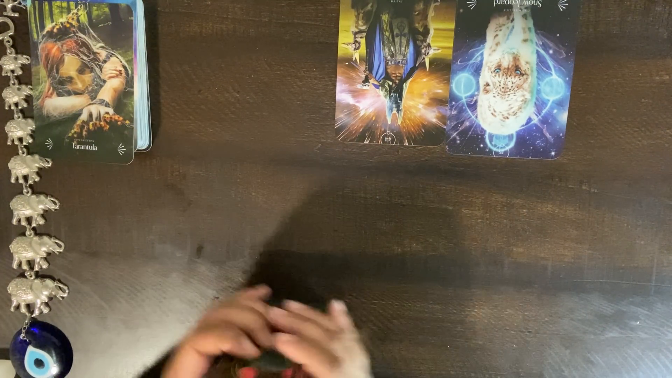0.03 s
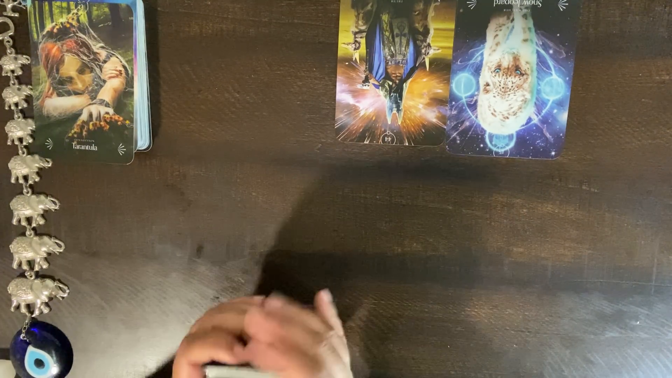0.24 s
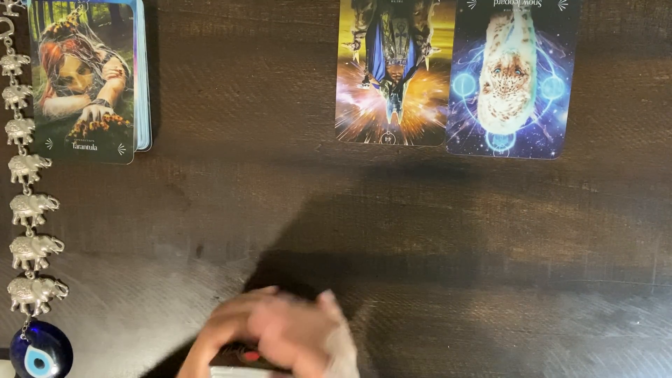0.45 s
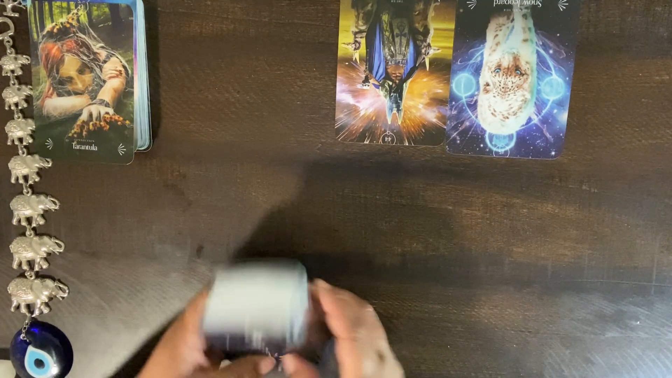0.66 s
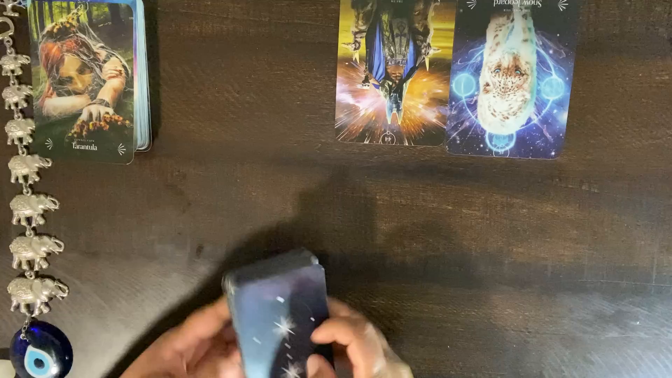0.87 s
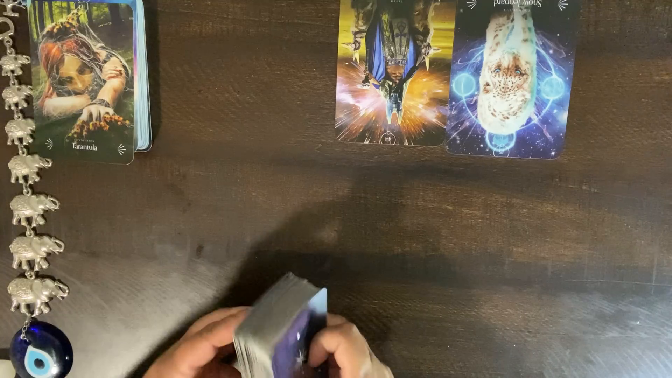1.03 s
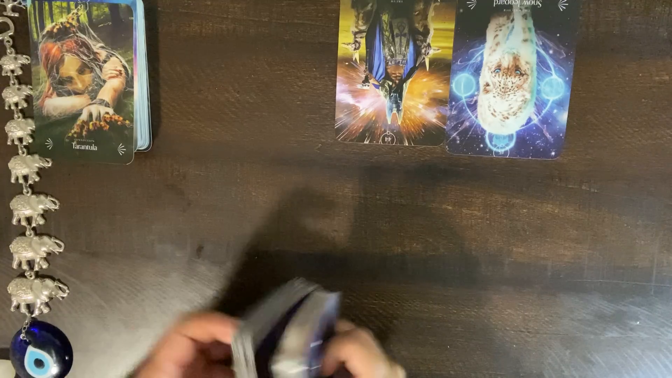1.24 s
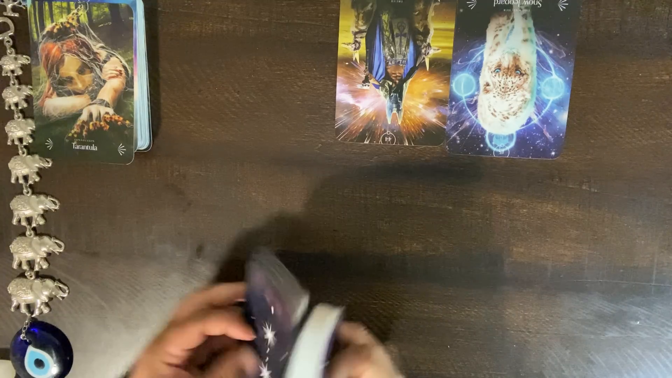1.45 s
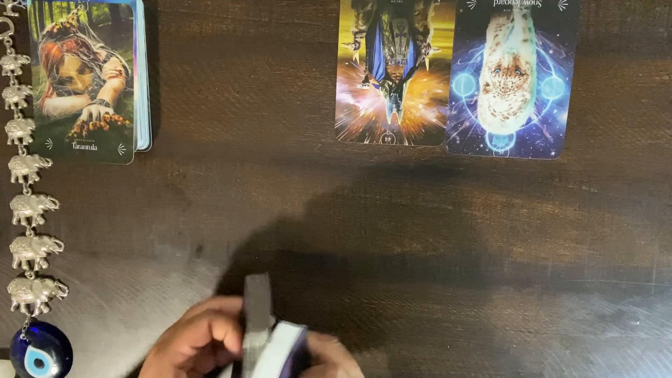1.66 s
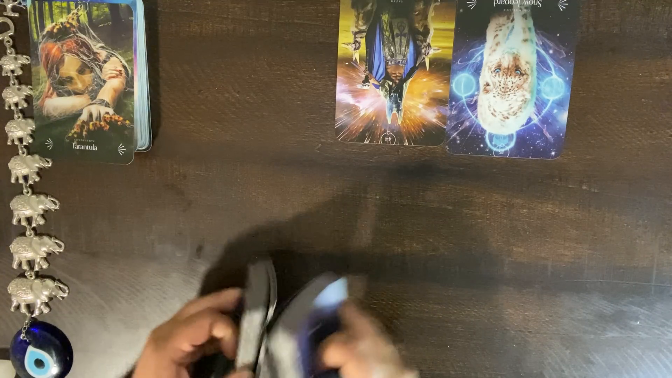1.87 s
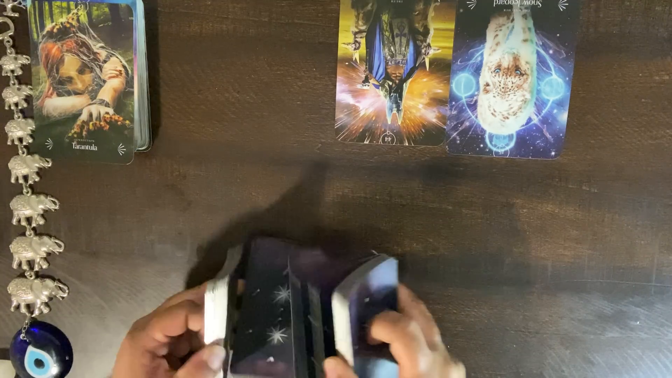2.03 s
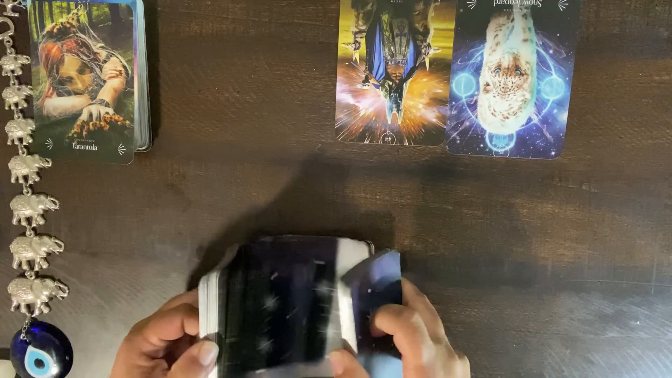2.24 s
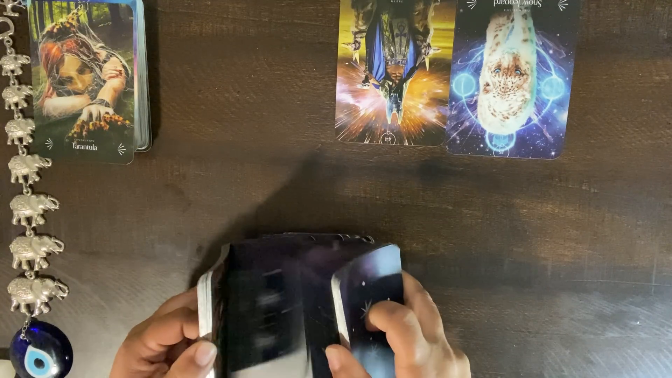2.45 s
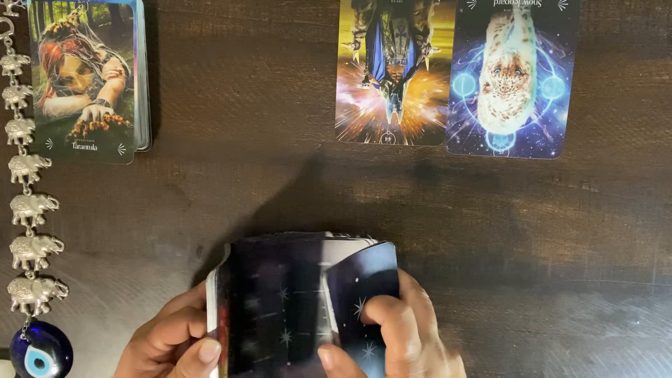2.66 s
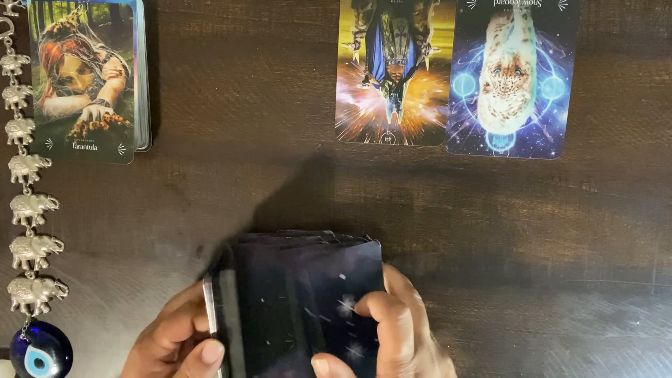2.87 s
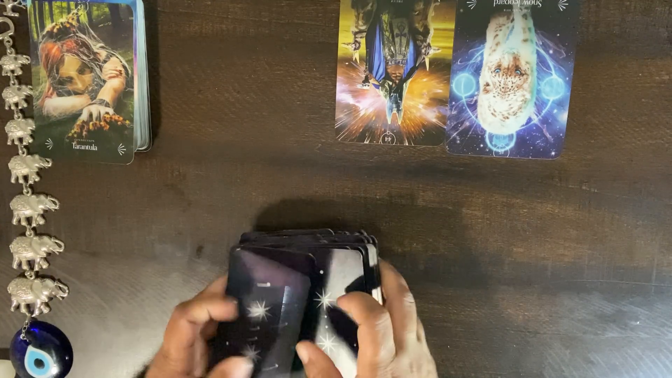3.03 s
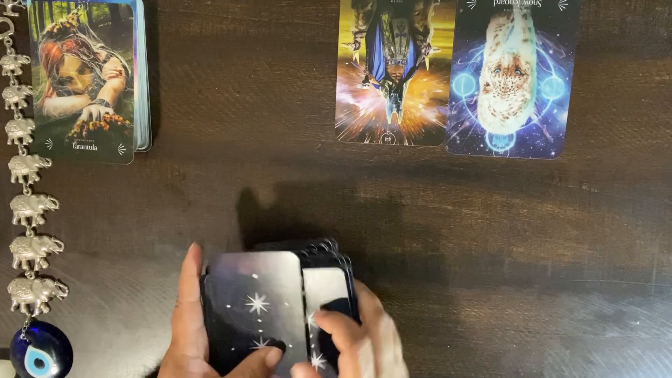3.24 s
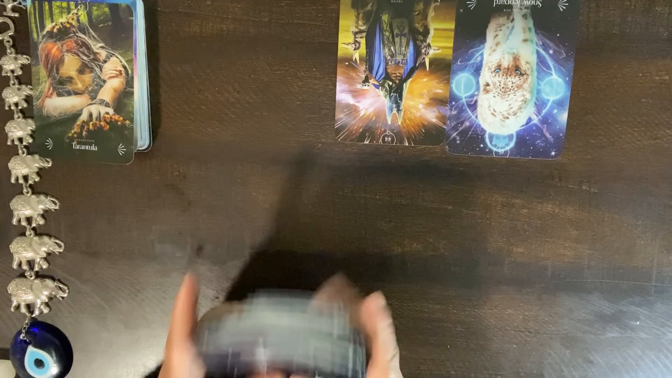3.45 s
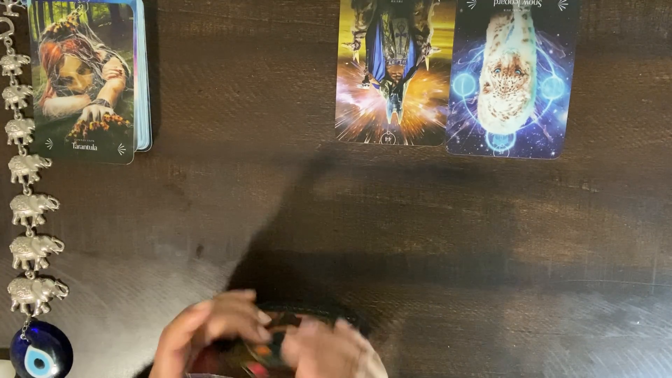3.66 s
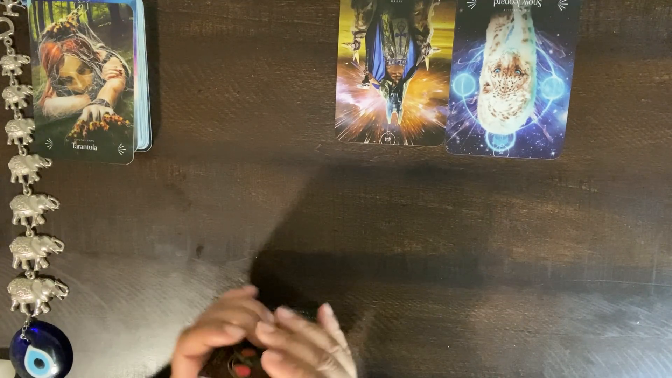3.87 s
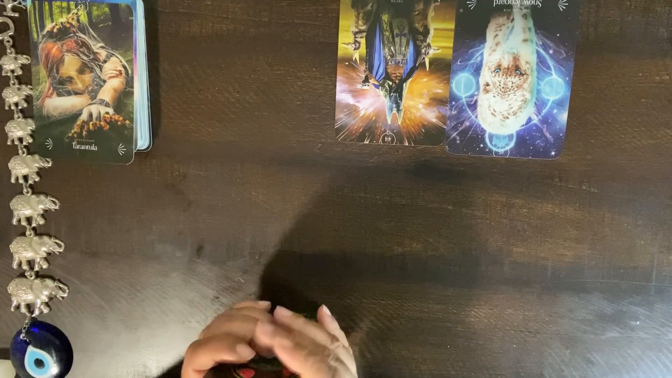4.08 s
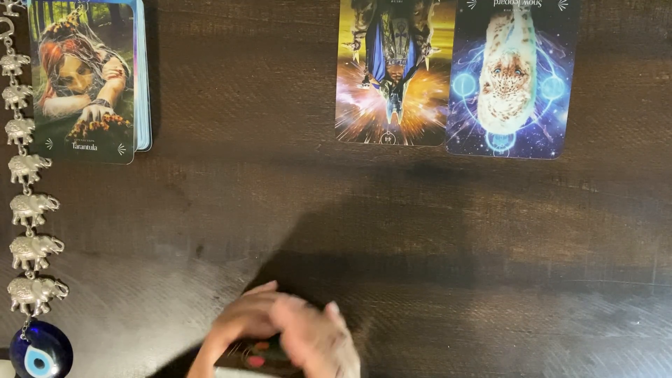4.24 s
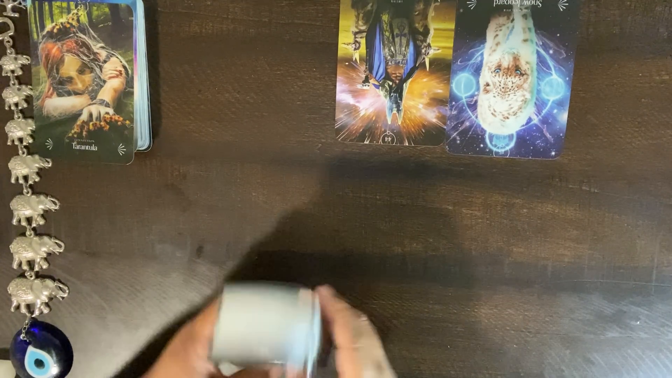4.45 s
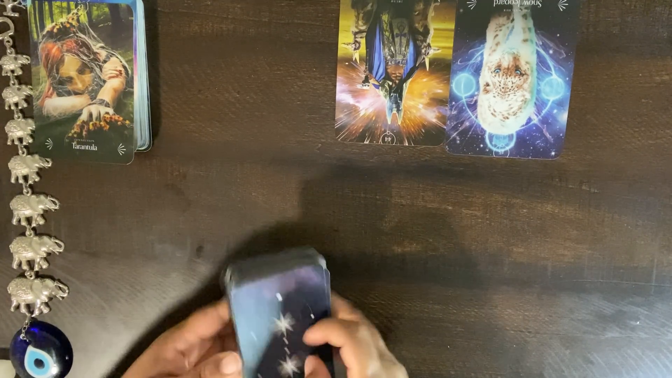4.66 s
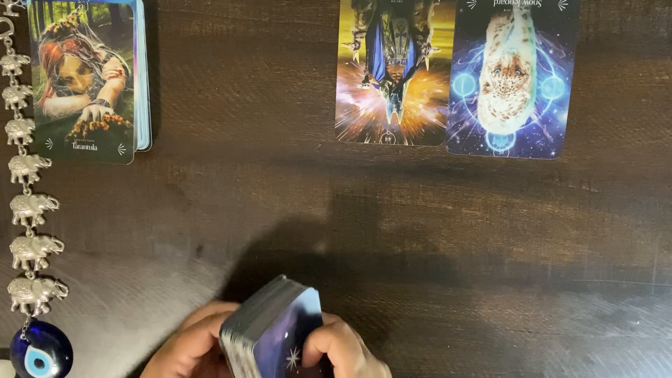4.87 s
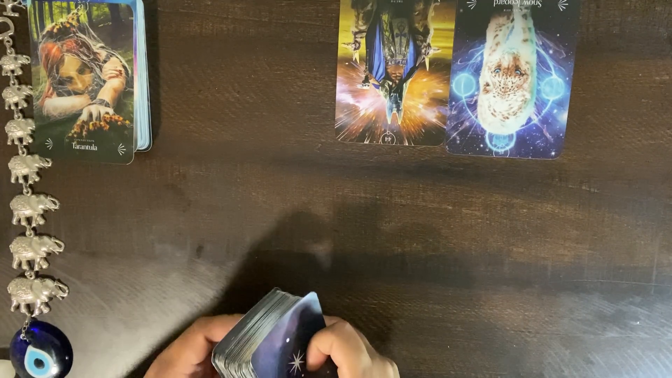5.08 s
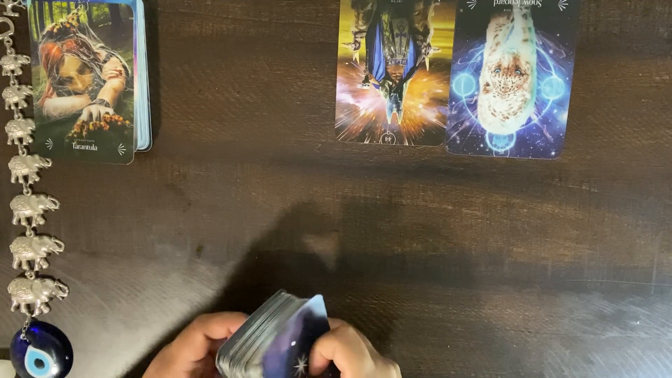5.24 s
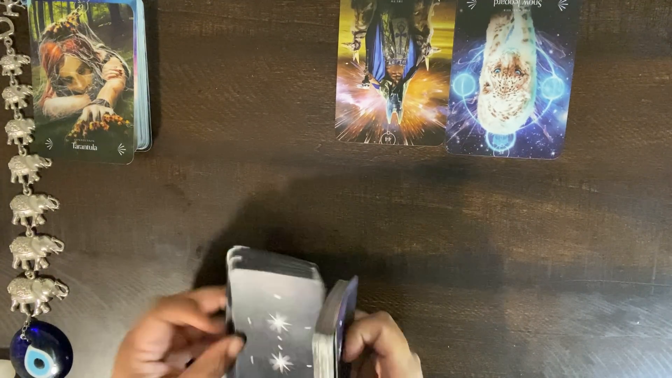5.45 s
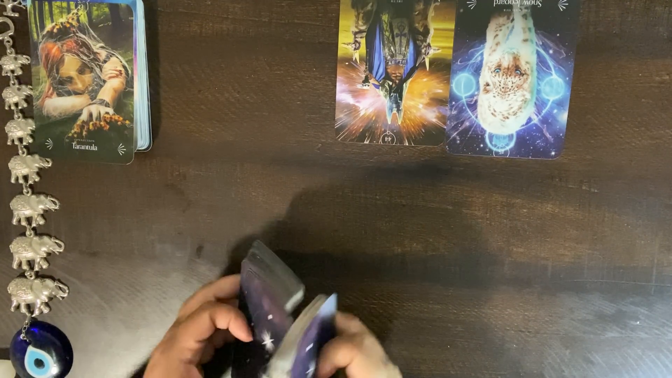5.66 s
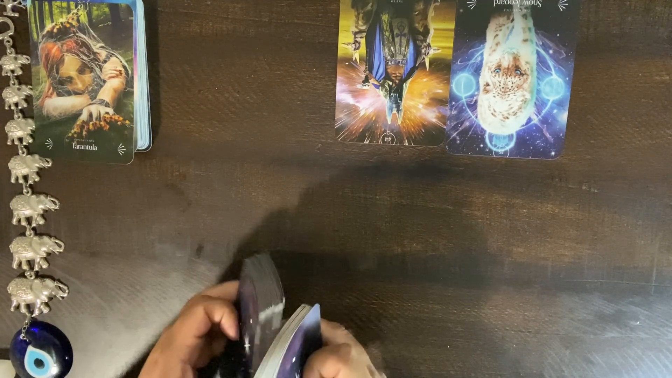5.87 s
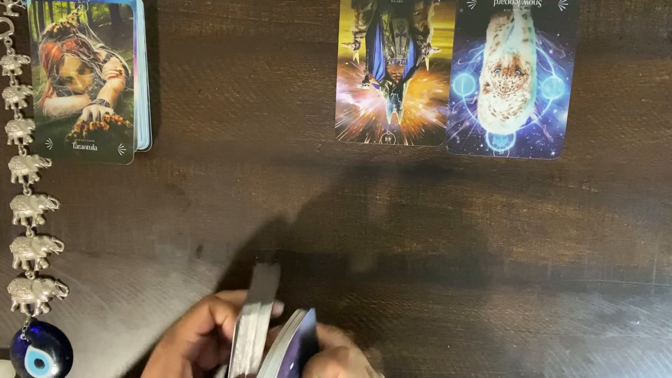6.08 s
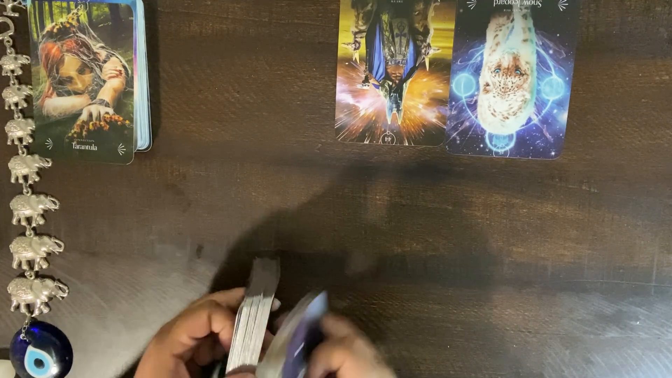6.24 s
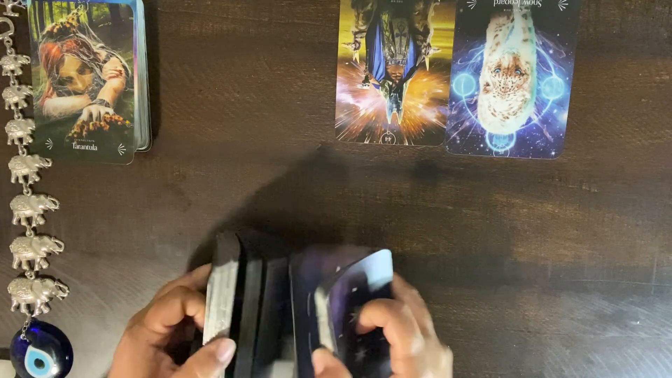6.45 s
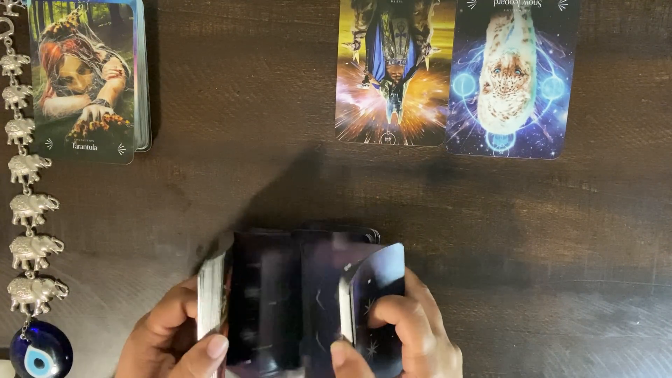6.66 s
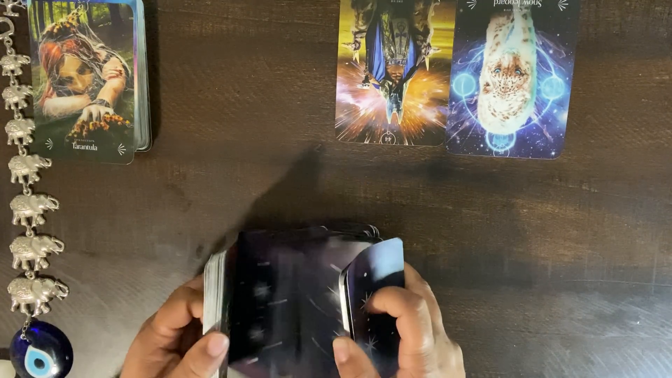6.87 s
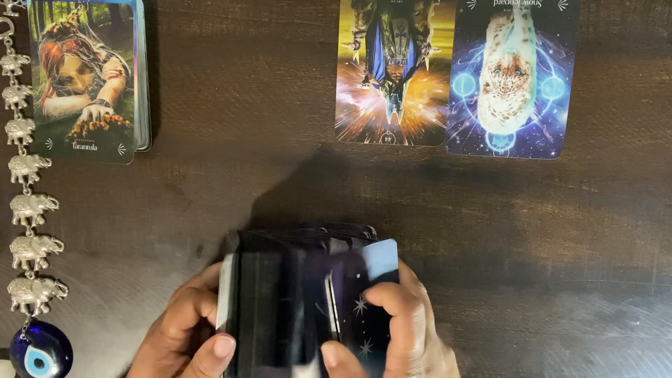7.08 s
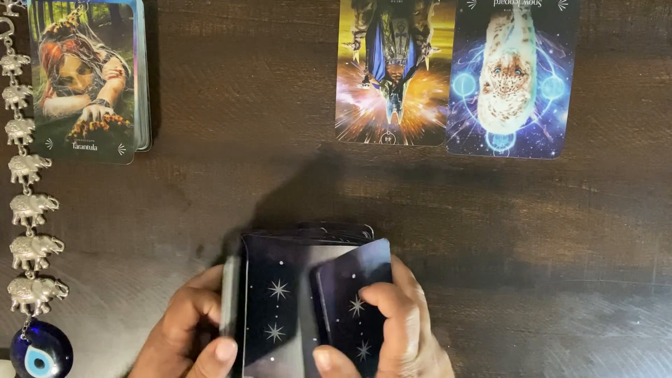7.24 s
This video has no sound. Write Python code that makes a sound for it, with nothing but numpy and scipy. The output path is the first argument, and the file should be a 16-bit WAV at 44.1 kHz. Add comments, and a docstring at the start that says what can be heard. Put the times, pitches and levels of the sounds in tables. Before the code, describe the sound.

Hands shuffle glossy cards over a wooden table, heard from very near with little room echo and a faint low background. Quick uneven taps come first, then light shuffling noises, crisp irregular snaps and papery sliding. The deck is tapped square again, nearly falls silent while being cut, and ends in a lively cluster of slaps, scrapes and finger rubs.

```python
"""Hand shuffling of large cards

A deck is knocked square on a wooden table, cut, and its halves pushed into each other, twice over, close by.
Knocks and snaps are short noise bursts filtered by card and hand resonances; the table adds decaying modes.
Faces hiss and fingers rub as unevenly gated, coloured noise; edges tick and small hollows pop.
A short room response and a quiet, mostly low noise floor surround them, heard through two microphone ports.
"""
import sys
import numpy as np
from scipy import signal
from scipy.fft import rfft, irfft, next_fast_len
from scipy.io import wavfile
from scipy.ndimage import uniform_filter1d

SR = 44100
rng = np.random.default_rng(int(sys.argv[2]) if len(sys.argv) > 2 else 0)


def store_pcm(level_fs):
    """Save levels as 16-bit WAV."""
    pcm = np.round(np.clip(level_fs, -1, 1) * 32767).astype(np.int16)
    wavfile.write(sys.argv[1], SR, np.atleast_2d(pcm).T)


N = 322371
TIME = np.arange(N) / SR  # s

# Stacked edges meet table, fingers or the other packet:
# (time [s], contact length [s], relative level [dB], brightness [dB/octave])
KNOCKS = [(0.062, 0.0081, -38.5, -14.5), (0.133, 0.012, -23.5, -3), (0.168, 0.0058, -31.5, -5),
          (0.2144, 0.0043, -18.5, 2.5), (0.290, 0.012, -34, -6.5), (0.3271, 0.003, -19.5, 6),
          (0.3305, 0.0082, -15.5, -4), (0.368, 0.0078, -31, 0.5), (0.558, 0.0037, -32.5, 3),
          (0.926, 0.0033, -41.5, 8), (0.938, 0.0064, -42.5, 2.5), (0.951, 0.0045, -40, 4),
          (1.112, 0.0071, -42.5, 6.5), (1.127, 0.02, -46.5, 0), (1.542, 0.0042, -40, -9.5),
          (1.548, 0.019, -48.5, -18), (3.14, 0.0053, -27.5, 8), (3.591, 0.0065, -22.5, -6),
          (3.602, 0.01, -29, -12.5), (3.618, 0.0046, -20, -5), (3.635, 0.004, -30.5, 0),
          (3.694, 0.0065, -26, -1.5), (3.739, 0.0041, -28.5, -4), (3.859, 0.013, -24.5, -6),
          (3.876, 0.0047, -32.5, 5), (3.923, 0.0065, -37, -6), (3.951, 0.0042, -32, 1.5),
          (4.062, 0.0089, -22, -2.5), (4.07, 0.0031, -19.5, -4.5), (4.0753, 0.0052, -22.5, 3),
          (4.163, 0.0084, -36.5, -8), (4.324, 0.0046, -34.5, 2), (4.356, 0.002, -34, 4.5),
          (4.373, 0.025, -42, -4), (4.737, 0.0055, -37.5, 4.5), (4.746, 0.0066, -41, 2),
          (4.754, 0.012, -43.5, 2), (5.267, 0.0069, -55.5, -8), (5.303, 0.0073, -50.5, 3.5),
          (5.459, 0.002, -33.5, 5.5), (5.463, 0.015, -45, 1.5), (5.516, 0.013, -45.5, -5.5),
          (5.601, 0.0049, -58, -10), (5.762, 0.016, -60.5, -3.5), (6.342, 0.008, -45.5, 5.5),
          (6.466, 0.0027, -26.5, 4.5)]
# Card edges slip free and slap their neighbours:
# (time [s], contact length [s], relative level [dB], brightness [dB/octave])
SNAPS = [(1.1765, 0.0028, -32, 1.5), (1.412, 0.009, -44, -21), (1.4235, 0.00057, -31, 5.5),
         (1.9085, 0.0014, -33.5, 1), (2.022, 0.005, -40, -10), (2.035, 0.0039, -22.5, 2.5),
         (2.082, 0.0036, -33, 2), (2.1012, 0.0021, -22.5, 1), (2.1055, 0.013, -35, 1.5),
         (2.181, 0.0048, -38, 0.5), (2.2865, 0.0038, -35.5, 2.5), (2.3015, 0.011, -29.5, -3),
         (2.311, 0.003, -31, 5.5), (2.448, 0.0048, -32.5, 0), (2.458, 0.0018, -33, 8.5),
         (2.485, 0.0042, -41, 7), (2.528, 0.0017, -27, 5), (2.586, 0.003, -47, 0.5),
         (2.603, 0.0027, -30.5, 3.5), (2.63, 0.0022, -37, 10.5), (2.691, 0.018, -48, 1),
         (2.804, 0.0013, -28, 1), (2.8178, 0.0015, -15.5, 2.5), (2.846, 0.0013, -35, -11),
         (3.008, 0.0082, -37, 0), (3.036, 0.002, -35.5, -5), (3.194, 0.0024, -36.5, 2.5),
         (3.294, 0.011, -36.5, 1.5), (3.31, 0.0087, -47, 8.5), (3.437, 0.015, -45.5, 2.5),
         (5.712, 0.0023, -50, 1.5), (6.489, 0.019, -28, 3), (6.521, 0.0069, -20, 4), (6.539, 0.011, -32, 3),
         (6.556, 0.0096, -28.5, -2), (6.595, 0.0021, -21, 7.5), (6.599, 0.0055, -25, -9),
         (6.657, 0.0061, -30.5, 1), (6.6825, 0.0055, -28, 1.5), (6.7, 0.0044, -32.5, -0.5),
         (6.722, 0.0062, -40.5, 0), (6.798, 0.0036, -34.5, 2.5), (6.833, 0.0029, -35, 1.5),
         (6.8455, 0.00098, -27.5, 2.5), (6.8845, 0.0038, -36.5, 2.5), (6.995, 0.0089, -47.5, -8),
         (7.03, 0.0051, -42.5, 3.5), (7.149, 0.017, -29.5, -20), (7.162, 0.0049, -29, 2.5),
         (7.183, 0.0038, -26, 1)]
# A small hollow between cards and fingers claps shut: (time [s], pitch [Hz], peak level [dB])
POPS = [(0.785, 1220, -42.5), (1.417, 800, -42.5)]
POP_RISE_S = 0.0011  # time to the peak of the envelope
# Edges of one packet skim along the other:
# (middle time [s], half length [s], relative level [dB], brightness [dB/octave])
BRUSHES = [(3.838, 0.016, -33, -10), (4.057, 0.013, -32.5, -11.5), (5.996, 0.016, -55.5, 0),
           (6.371, 0.038, -48, -2.5)]

# Resonances of the stacked deck: (centre [Hz], width [Hz], lift [dB])
DECK_MODES = [(845, 210, 7.5), (1243, 55, 4), (1463, 23, 8.5), (1993, 460, 7), (2410, 65, 4.5),
              (4600, 220, 4)]
# Fingers cushion a knock: (brightness [dB/octave], end of its treble [Hz])
CUSHION_EDGE = [(-10, 2800), (-5, 5150)]
# Treble lost above that end: (knock level [dB], loss [dB])
CUSHION_LOSS = [(-38, 17), (-22, 0)]
# Hollow between the cupped hands: (centre before grip shift [Hz], width [Hz], lift [dB])
HOLLOW_MODES = [(1600, 110, 1.5), (2045, 400, 7.5)]
GRIP_SPREAD = 0.067  # standard deviation of the hollow's log pitch from snap to snap
CARD_HZ, CARD_OCTAVES_PER_DB = 1860, -0.5  # ring of a dull snap; shift per dB/octave of positive brightness
CARD_WIDTH, CARD_LIFT_DB = 0.63, 4  # width as a share of the pitch; height of the resonance
TICK_HZ, TICK_DECAY_S = 3670, 0.0013  # middle pitch and burst time constant of a caught edge
# How much the sliding catches on edges: (time [s], share [0-1])
CATCH = [(1.85, 0), (2.1, .9), (2.75, .9), (2.9, .6), (3.35, .6), (3.6, 0), (6.4, 0), (6.5, .5), (7.3, .35)]

# Modes of the table top: (frequency before detuning [Hz], relative level [dB], t60 when free [s])
TABLE_MODES = [(67.8, -15.5, 0.17), (120, 2, 0.25), (235, 4.5, 0.27), (258, 5, 0.11), (292.2, 7.5, 0.14),
               (336, -5, 0.15), (379, -7.5, 0.26), (478.5, -10.5, 0.34), (650, 0.5, 0.11),
               (771, -6.5, 0.28)]
# Packets land with a low thud on the table, often together with a knock or snap:
# (time [s], relative level [dB])
DROPS = [(0.292, -37.5), (0.573, -42.5), (1.545, -51), (2.036, -32), (2.101, -40), (3.079, -49),
         (3.754, -37.5), (4.738, -53.5), (6.494, -38.5), (6.888, -54), (7.154, -51)]
# The deck stands on the table to be squared, otherwise it is held clear: (start [s], end [s])
SQUARING = [(0, 0.7), (3.55, 4.45)]
# Thud relative to its knock [dB], contact length for that thud [s], change per dB/octave of brightness [dB]
THUD_DB, THUD_CONTACT_S, THUD_DB_PER_BRIGHTNESS = -12.5, 0.017, -1

# A packet is drawn over another: (time of top speed [s], run-up [s], relative level [dB])
STROKES = [(0.039, 0.98, -46), (0.333, 0.033, -49.5), (0.48, 0.26, -60), (1.306, 0.086, -49),
           (1.432, 0.053, -56), (1.636, 0.021, -61.5), (2.054, 0.054, -44), (2.62, 0.67, -58),
           (2.864, 0.24, -50), (3.15, 0.15, -59.5), (3.6, 0.43, -55.5), (3.766, 0.24, -47),
           (4.261, 0.14, -59), (5.394, 0.068, -50.5), (6.075, 0.066, -59), (6.85, 0.26, -55),
           (7.168, 0.14, -43.5)]
RUN_UP_DB, STOP_S = 26.5, 0.016  # growth over the run-up; time constant of dying away
# Loose cards creep over each other: (time [s], relative hiss level [dB])
CREEP = [(0, -71), (0.27, -90), (0.5, -67.5), (1.36, -75), (1.8, -91.5), (2.1, -65.5), (2.75, -63),
         (2.95, -70.5), (3.5, -62.5), (4, -70), (4.68, -69.5), (5.02, -90.5), (5.3, -89), (5.55, -68),
         (5.87, -90.5), (6.32, -89), (6.55, -57), (6.95, -71), (7.3, -57)]
# Fingers take a new grip and rub along the deck: (start [s], length [s], relative level [dB])
RUBS = [(0.0, 0.0073, -22), (0.13, 0.08, -37), (0.546, 0.1, -42.5), (1.169, 0.08, -47),
        (1.872, 0.15, -53.5), (2.76, 0.14, -45.5), (3.119, 0.25, -45.5), (3.447, 0.047, -43),
        (3.621, 0.171, -39.5), (5.304, 0.075, -55.5), (6.65, 0.14, -52.5), (7.076, 0.19, -44.5)]
RUB_ATTACK_S, RUB_SAG_DB_PER_S, RUB_RELEASE_S = 0.0059, 13, 0.0053
# Hands hold the deck between those moves: (time [s], relative rubbing level [dB])
HOLD = [(0, -38), (0.27, -45), (0.72, -62.5), (1.25, -53.5), (1.38, -75.5), (1.55, -57.5), (1.8, -83),
        (2.05, -54.5), (3.4, -57.5), (4.3, -54.5), (4.55, -62), (5.1, -62.5), (5.23, -75), (5.55, -60),
        (5.78, -66.5), (5.92, -80.5), (6.28, -79), (6.55, -46), (6.95, -61.5), (7.3, -50.5)]
# Heels of the hands drag on the table: (time [s], relative rumble level [dB])
DRAG = [(0, -38), (0.75, -67), (1.8, -73), (2.1, -53.5), (3.3, -57), (3.55, -80), (3.7, -58), (4.35, -51.5),
        (4.55, -68), (6.3, -75), (6.55, -43.5), (7, -61), (7.3, -54)]

# Spectrum of the knocks and brushes: (frequency [Hz], relative level [dB])
KNOCK_COLOUR = [(120, -40.5), (300, 0), (550, -11.5), (780, -6), (1850, -2.5), (2750, -5), (4000, -5),
                (4900, -9), (6800, -19.5), (16000, -49.5)]
# Spectrum of the snaps: (frequency [Hz], relative level [dB])
SNAP_COLOUR = [(120, -17), (500, -6.5), (950, -2), (2100, -4), (2800, -7), (4300, -7.5), (6900, -13),
               (11000, -18), (16000, -26.5)]
# Spectrum of faces sliding: (frequency [Hz], relative level [dB])
SLIDE_COLOUR = [(150, -32.5), (700, -9), (1300, -0.5), (2200, -2.5), (3000, 3), (11000, 0.5), (13000, 0),
                (16000, -33)]
# Spectrum of fingers rubbing: (frequency [Hz], relative level [dB])
RUSTLE_COLOUR = [(200, 0), (550, 2.5), (1200, 4), (2100, 3.5), (2700, -4), (4750, -8), (5500, -17.5),
                 (14000, -41.5)]
# Spectrum of hands dragging and of table blows: (frequency [Hz], relative level [dB])
RUMBLE_COLOUR = [(28, -37.5), (58, 6), (90, -3), (128, 7.5), (175, -3.5), (290, -2), (430, -13.5),
                 (900, -39)]
# Spectrum of the background noise: (frequency [Hz], relative level [dB])
ROOM_COLOUR = [(22, -30.5), (38, -5), (54, 9), (75, 3.5), (200, -22.5), (450, -15.5), (1200, -32),
               (4000, -57.5), (15000, -54)]
# How unlike the two ports hear a source: (frequency [Hz], side minus mid [dB])
WIDTH = [(100, -34.5), (300, -7), (700, -5.5), (1800, -14), (3000, -1), (4800, -9.5), (9000, -22)]
# Phase of the left port ahead of the right: (frequency [Hz], phase [rad])
LEAD = [(100, 0), (1800, -.2), (2600, -1), (3800, -.25), (6400, -.2), (8500, -1), (10700, -1.9),
        (13200, -3)]
TOP_HZ = 15800  # upper limit of the ports


def contacts(rows, timbre, rough_db, rise, pan_db, size=6144):
    """Impact excitation: many tiny edge impacts within one contact ring the stiff, damped card."""
    out, t = np.zeros((2, N)), np.arange(size) / SR
    for start, length, db, tilt_db in rows:
        age = t / max(length, 1e-3)
        envelope = age ** rise * np.exp(-2.8 * age)
        impacts = port_noise(size, pan_db) * grains(size, rough_db, 2200) * envelope
        spectrum, resonances = timbre(db, tilt_db)
        burst = unit(colour(impacts, spectrum, tilt_db, resonances))
        # Refer the level to the contact length rather than to the whole buffer
        add(out, start, burst * np.sqrt(length * SR / size) * undb(db))
    return out


def knock_colour(db, brightness_db):
    """Cushioned impact: soft fingers cut the treble, deeper for a weak knock and lower for a dull one."""
    hz = np.fft.rfftfreq(1024, 1 / SR)[1:]
    edge_hz = np.interp(brightness_db, *np.array(CUSHION_EDGE).T)
    loss_db = np.interp(db, *np.array(CUSHION_LOSS).T)
    cushioned_db = along(KNOCK_COLOUR, hz) - loss_db / (1 + (edge_hz / hz) ** 20)
    return np.column_stack([hz, cushioned_db]), DECK_MODES


def snap_colour(db, brightness_db):
    """Coupled resonators: the card's ring falls with positive brightness; the hollow shifts with the grip."""
    hz = CARD_HZ * 2 ** (CARD_OCTAVES_PER_DB * max(brightness_db, 0))
    card = [(hz, hz * CARD_WIDTH, CARD_LIFT_DB)]
    grip = np.exp(GRIP_SPREAD * rng.standard_normal())
    hollow = [(f * grip, width, lift) for f, width, lift in HOLLOW_MODES]
    return SNAP_COLOUR, card + hollow


def table_thuds(push_s, blow_db, blow_s, cushion_hz, held_share, size=16384):
    """Modal excitation: a blow rings the table; with the deck held clear, its ring is softer and shorter."""
    out, t = np.zeros((2, N)), np.arange(size) / SR
    hz, mode_db, t60 = np.array(TABLE_MODES).T[:, :, None]
    landings = list(DROPS)
    for start, length, db, brightness in KNOCKS:
        if squaring(start):
            # A longer contact pushes the table more, a bright one less
            push_db = THUD_DB + THUD_DB_PER_BRIGHTNESS * brightness
            landings.append((start, db + push_db + 10 * np.log10(length / THUD_CONTACT_S)))
    for start, db in landings:
        detune = rng.standard_normal((len(TABLE_MODES), 1))
        cushion = 1 if squaring(start) else 1 / (1 + (hz / cushion_hz) ** 2)
        ring_s = t60 if squaring(start) else t60 * held_share
        modes = cushion * undb(mode_db) * np.sin(2 * np.pi * hz * (1 + 0.015 * detune) * t)
        ring = (modes * np.exp(-np.log(1000) * t / ring_s)).sum(0)
        ring *= 1 - np.exp(-t / push_s)
        blow = colour(port_noise(size, 0.96) * np.exp(-t / blow_s), RUMBLE_COLOUR)
        thud = unit(ring) + undb(blow_db) * unit(blow)
        add(out, start, thud * undb(db) / thud[:, :SR // 40].std())  # level over the first 25 ms
    return signal.sosfilt(signal.butter(4, 45, "highpass", fs=SR, output="sos"), out)


def squaring(time):
    """Boundary condition: whether the deck stands on the table at this time."""
    return any(start < time < end for start, end in SQUARING)


def sliding():
    """Sliding friction: smooth faces hiss; interleaved halves roughen the hiss and add ticks."""
    catch = curve(CATCH)
    friction = port_noise(N) * grains(N, 1.4 + 1.8 * catch, 900) * grains(N, 0.7 + 1.5 * catch, 60)
    hiss = unit(colour(friction, SLIDE_COLOUR)) * undb(-1.5 * catch)
    ticks = catches(rate=70, octaves=2.6, spread_db=12)
    return (undb(6.5) * hiss + ticks) * strokes()


def strokes():
    """Speed-dependent friction: hiss grows as a packet gathers speed and dies when it comes clear."""
    gain = undb(curve(CREEP))
    for peak, run_up, db in STROKES:
        age = TIME - peak
        growth = undb(db + RUN_UP_DB * np.minimum(age, 0) / run_up)
        stop = np.exp(-np.maximum(age, 0) / STOP_S)
        gain = np.hypot(gain, growth * stop)
    return gain


def catches(rate, octaves, spread_db, count=600, size=1024):
    """Random release: edges catch and let go as resonant ticks, their pitch set by the free card length."""
    out, t = np.zeros((2, N)), np.arange(size) / SR
    wait, luck, pitch, strength = rng.random((count, 4)).T
    starts = np.cumsum(-np.log(wait)) / rate  # rate in candidates per second
    bursts = port_noise(count * size).reshape(2, count, size) * np.exp(-t / TICK_DECAY_S)
    caught = luck < np.interp(starts, *np.array(CATCH).T)
    for k in np.flatnonzero(caught):
        hz = min(TICK_HZ * 2 ** (octaves * (pitch[k] - .5)), SR / 4)
        tick = signal.lfilter(*signal.iirpeak(hz, 2, fs=SR), bursts[:, k])
        add(out, starts[k], unit(tick) * undb(-spread_db * strength[k]))
    return unit(out)


def brushes(rough_db, size=16384):
    """Grazing contact: edges skim along the other packet in a soft, finely grained swell."""
    out, t = np.zeros((2, N)), (np.arange(size) - size / 2) / SR
    for middle, half, db, tilt_db in BRUSHES:
        friction = port_noise(size, 2.6) * grains(size, rough_db, 460)
        skim = unit(colour(friction, KNOCK_COLOUR, tilt_db, DECK_MODES))
        add(out, middle + t[0], skim * undb(db) * np.exp(-(t / half) ** 2))
    return out


def pops(size=2048):
    """Cavity resonance: a small hollow between cards and fingers closes and rings briefly."""
    out, t = np.zeros((2, N)), np.arange(size) / SR
    for start, hz, db in POPS:
        envelope = t / POP_RISE_S * np.exp(1 - t / POP_RISE_S)
        add(out, start, undb(db) * (envelope * np.sin(2 * np.pi * hz * t))[None])
    return out


def hands(rustle_db, rumble_db):
    """Stick-slip friction: fingertips rub in jerks where edges catch, while the hands drag on the table."""
    jerk_db = 2 + 2 * curve(CATCH)
    pressure = uniform_filter1d(grains(N, 2.0, 30), SR // 80)
    jerks = pressure * grains(N, jerk_db, 400) * grains(N, jerk_db, 90)
    rustle = colour(port_noise(N, 2.1) * jerks, RUSTLE_COLOUR)
    rumble = colour(port_noise(N) * grains(N, 2.5, 30), RUMBLE_COLOUR)
    return undb(rustle_db) * unit(rustle) * rubs() + unit(rumble) * undb(rumble_db + curve(DRAG))


def rubs():
    """Transient friction: each rub bites quickly, eases while it lasts and lets go."""
    gain = undb(curve(HOLD))
    for start, length, db in RUBS:
        age = np.maximum(TIME - start, 0)
        attack = 1 - np.exp(-age / RUB_ATTACK_S)
        release = np.exp(-np.maximum(age - length, 0) / RUB_RELEASE_S)
        gain = np.hypot(gain, attack * release * undb(db - RUB_SAG_DB_PER_S * age))
    return gain


def room(x, t60, early_db, early_s, late_db, size=22050):
    """Reverberation: quick reflections off table and hands, then the short, dull ring of the walls."""
    t = np.arange(size) / SR
    reflections = port_noise(size) * grains(size, 3, 4000) * (t > .0015)
    early = reflections * np.exp(-t / early_s)
    late = rng.standard_normal((2, size)) * np.exp(-np.log(1000) * t / t60) * (t > .008)
    # Wall spectrum: (frequency [Hz], relative level [dB])
    late = colour(unit(late), [(100, -9.0), (800, 1.5), (2800, 3.0), (5000, -6.0), (15000, -23.5)])
    response = (undb(early_db) * unit(early) + undb(late_db) * late) / np.sqrt(size)
    return signal.fftconvolve(x, response, axes=1)[:, :N]


def background():
    """Stationary noise: a quiet, mostly low floor lies under everything."""
    return undb(-63.0) * unit(colour(port_noise(N), ROOM_COLOUR))


def port_noise(size, pan_db=0):
    """Spatial coherence: two ports share most of the bass, differ most near 3 kHz, agree again higher up."""
    mid, side = rng.standard_normal((2, 1, size))
    sign = np.array([[1], [-1]])
    return (mid + sign * colour(side, WIDTH)) * undb(sign * pan_db / 2)


def grains(size, spread_db, rate):
    """Stick and slip: a random gain is held for 1 / rate seconds at a time."""
    step = (np.arange(size) * rate / SR).astype(int)
    return undb(spread_db * rng.standard_normal(size)[step])


def colour(x, points, tilt_db=0, resonances=(), size=4096):
    """Minimum-phase filtering: a causal response with a given spectrum, resonances and treble tilt."""
    hz = np.fft.rfftfreq(size, 1 / SR)
    octaves = np.log2(np.maximum(hz / 1600, 1))  # the tilt acts above 1600 Hz
    lift = sum(db / (1 + (2 * (hz - centre) / width) ** 2) for centre, width, db in resonances)
    cepstrum = irfft(np.log(undb(along(points, hz) + lift + tilt_db * octaves)))
    # Fold the cepstrum onto positive time to make the response causal
    cepstrum[1:size // 2] *= 2
    cepstrum[size // 2 + 1:] = 0
    response = irfft(np.exp(rfft(cepstrum)))
    return signal.fftconvolve(x, response[None], axes=1)[:, :x.shape[1]]


def along(points, hz):
    """Logarithmic pitch scale: interpolate (frequency [Hz], value) points on a log axis."""
    points = np.array(points)
    return np.interp(np.log(hz + 1), np.log(points[:, 0]), points[:, 1])


def curve(rows):
    """Slow control: join (time [s], value) rows by straight lines."""
    times, values = np.array(rows).T
    return np.interp(TIME, times, values)


def undb(db):
    """Logarithmic level: convert decibels to an amplitude gain."""
    return 10 ** (np.asarray(db) / 20)


def unit(x):
    """Mean power: scale to an rms of one."""
    return x / np.sqrt(np.mean(x ** 2) + 1e-20)


def add(out, start, sound):
    """Superposition: mix a sound in at a time in seconds."""
    i = max(int(start * SR), 0)
    part = out[:, i:i + sound.shape[1]]
    part += sound[:, :part.shape[1]]


def scene():
    """Direct and reflected sound: knocks low behind the hands excite more room than the facing snaps."""
    knocks = contacts(KNOCKS, knock_colour, rough_db=0.0, rise=0.92, pan_db=3.5)
    snaps = undb(-0.5) * contacts(SNAPS, snap_colour, rough_db=3.5, rise=0.92, pan_db=0.4)
    thuds = undb(4.0) * table_thuds(push_s=0.00066, blow_db=-4.0, blow_s=0.022,
                                    cushion_hz=199, held_share=0.88)
    near = snaps + pops() + brushes(rough_db=2.5) + sliding() + hands(rustle_db=-2.0, rumble_db=0.5)
    knock_echoes = room(knocks, t60=0.25, early_db=-6.5, early_s=0.012, late_db=-6.5)
    near_echoes = room(near, t60=0.1, early_db=-8.0, early_s=0.0035, late_db=-9.0)
    return knocks + thuds + near + knock_echoes + near_echoes + background()


def record(dry):
    """Interchannel phase: the two ports differ in phase towards the treble, and the top is cut."""
    size = next_fast_len(N + 4096)
    lead = along(LEAD, np.fft.rfftfreq(size, 1 / SR))
    turn = np.exp(.5j * np.array([lead, -lead]))
    ports = irfft(rfft(dry, size) * turn, size)[:, :N]
    return signal.sosfilt(signal.ellip(8, .2, 70, TOP_HZ, fs=SR, output="sos"), ports)


dry = scene()
out = record(dry)
store_pcm(out)
```